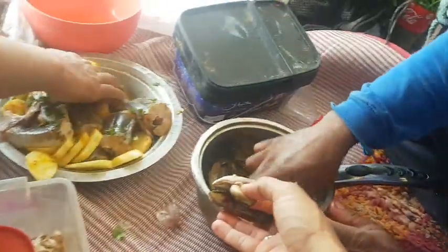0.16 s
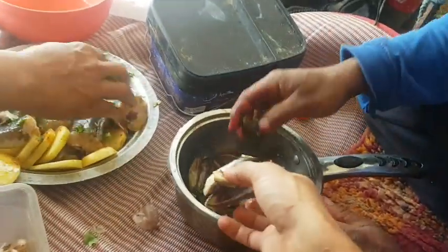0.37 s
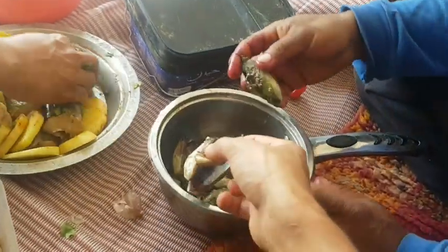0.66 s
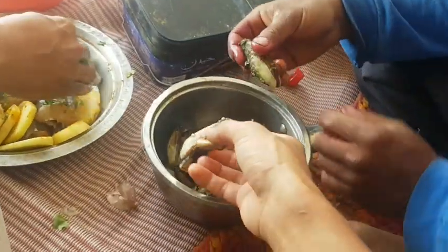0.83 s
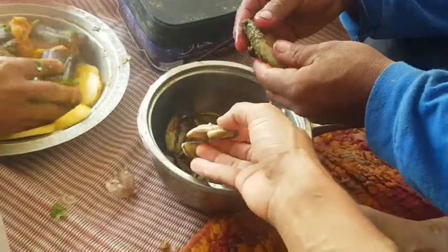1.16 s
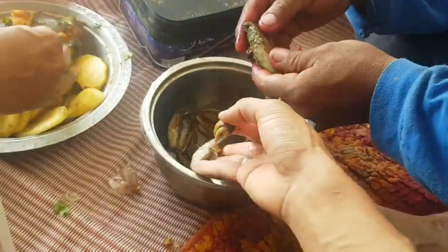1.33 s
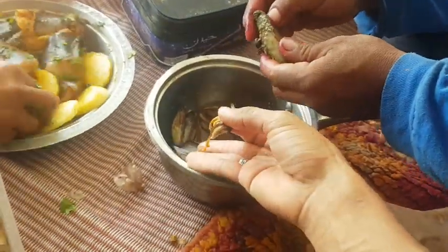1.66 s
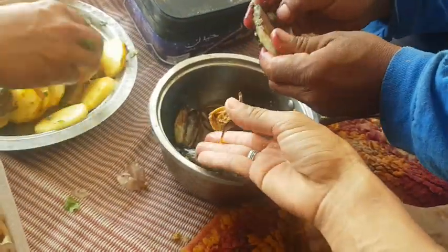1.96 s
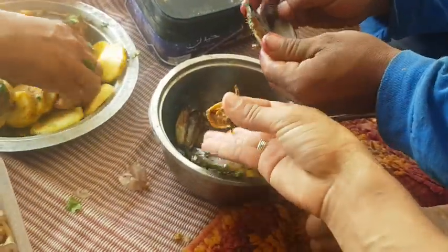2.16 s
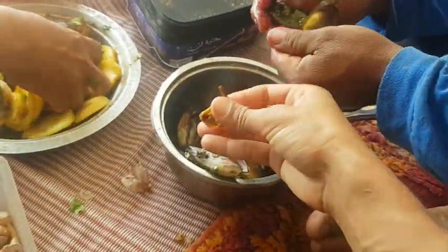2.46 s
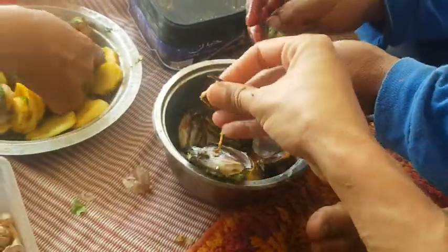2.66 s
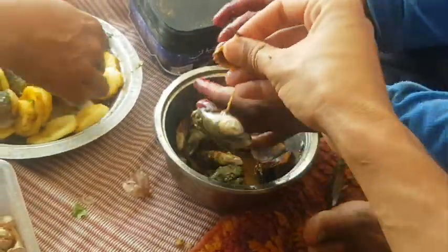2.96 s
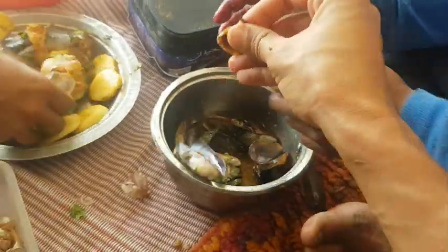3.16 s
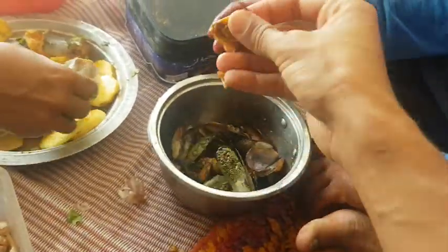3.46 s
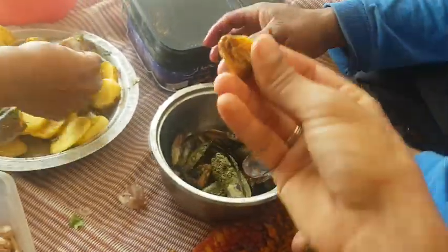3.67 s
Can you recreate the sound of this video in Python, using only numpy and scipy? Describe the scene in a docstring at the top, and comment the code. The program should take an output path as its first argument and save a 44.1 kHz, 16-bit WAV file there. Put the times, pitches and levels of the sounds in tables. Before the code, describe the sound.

Mussel shells click and clink against each other and a steel pot as hands pry them open

```python
"""Hands pick mussel shells out of a steel pot and pry them open, outdoors and heard close by.
First comes quick clicking over a wet scrape, then a lull with faint rustling; from 1.4 s the clicks return.
Near 3 s there is a low thud, then the hardest blows and a last run of clicks, while a soft rumble swells.
Each contact is a short chatter of tiny impacts that cracks and rings the shell's hollow; the pot rings too.
The rustle is ticks and noise in uneven patches; the outdoor air is filtered noise."""
import sys
import numpy as np
from scipy import signal
from scipy.fft import rfft, irfft, next_fast_len
from scipy.io import wavfile
from scipy.ndimage import uniform_filter1d

SR = 44100
rng = np.random.default_rng(int(sys.argv[2]) if len(sys.argv) > 2 else 0)


def transcribe(u):
    """Save the signal u as a 16-bit wav file named by the first command-line argument.

    u: samples, shape (n,) or (channels, n), limited to [-1, 1]; the rate is SR.
    q: integer samples, one column per channel.
    """
    v = np.clip(np.atleast_2d(u).T, -1, 1)
    q = np.round(v * 32767).astype(np.int16)
    wavfile.write(sys.argv[1], SR, q)


N = 167580  # length [samples]

RISE_S = 0.0024  # soft start of each contact [s]
# burst: share of samples with a micro-impact, decay [s]
GRIT_SHARE, CHATTER_S = 0.16, 0.003
# loose after-ticks behind each burst: level [dB], decay [s], share of samples
RATTLE_DB, RATTLE_S, RATTLE_SHARE = -13, 0.015, .03
SHELL_Q, SHELL_OVERTONE, OVERTONE_DB = 9., 1.818, -8  # sharpness, pitch ratio, level [dB]
CRACK_HZ, CRACK_Q, CRACK_DB = 1800, 1.3, -4
TREBLE_HZ, TREBLE_TOP_HZ = 3860, 11100  # edges of the treble band [Hz]
# low knock: deep shells and soft blows knock more
KNOCK_HZ, KNOCK_Q, KNOCK_DB = 499, 2, -20
KNOCK_DB_PER_OCT, KNOCK_PER_LEVEL = -7, -0.38  # per octave of shell pitch; per dB of contact level

# each pot mode is a pair of tones: spread of their detuning (share), of their level [dB]
POT_SPLIT, POT_SCATTER_DB = .009, 5.
POT_DB_PER_OCT = -4  # modes far from the shell's pitch ring less
SOFT_DAMPING = .2  # softer blows fade sooner
MUFFLED_T60 = .07  # extra fade once the next contact muffles the pot [s per 60 dB]

ECHO_DB, ECHO_T60, ECHO_START_S = -5.5, 0.093, .0005  # pot walls and mat
ECHO_TOP_HZ = 10800

TICKS_PER_S = 1800
SCRAPE_HZ, FIZZ_HZ = 1750, 7500.
PATCHY_DB, FLICKER_DB = 3.3, 1.6  # unevenness over time and pitch; over time alone

BUMP_S, BUMP_DB, BUMP_HZ, BUMP_T60 = 2.96, -31.5, 100, 0.069  # a hand knocks the mat
AIR_DB = -55.5  # steady air, average level
LAG_S, LAG_LIMIT = .00007, 1.5  # left-right lag of low tones [s]; largest phase difference [rad]
EDGE_HZ = 15900  # upper limit of the sound [Hz]


def amp(db):
    """Turns decibels into a factor."""
    return 10 ** (np.asarray(db) / 20)


def evened(x):
    """Scales x to rms 1."""
    return x / np.sqrt(np.mean(x ** 2) + 1e-20)


def read(points, hz):
    """Reads a (Hz, value) table between its points, along a logarithmic pitch scale."""
    f, value = np.transpose(points)
    return np.interp(np.log(hz + 1), np.log(f + 1), value)


def curve(points, column=1):
    """Draws straight lines over time between the points of a table."""
    columns = np.transpose(points)
    return np.interp(np.arange(N) / SR, columns[0], columns[column])


def add(mix, s, sound):
    """Adds a sound to the mix from s seconds on."""
    part = mix[round(s * SR):][:len(sound)]
    part += sound[:len(part)]


def band(x, hz, q):
    """One resonance, scaled to rms 1."""
    return evened(signal.lfilter(*signal.iirpeak(min(hz, SR / 2.2), q, SR), x))


def band_twice(x, hz, q):
    """The same resonance passed twice, for steeper sides."""
    return band(band(x, hz, q), hz, q)


def shaped(x, gain):
    """Multiplies the spectrum of x by gain(hz)."""
    size = next_fast_len(N)
    return irfft(rfft(x, size) * gain(np.fft.rfftfreq(size, 1 / SR)), size)[..., :N]


def shell_click(t, rise, db, shell_hz, treble_db):
    """A burst of micro-impacts drives the shell's hollow, a crack, treble and a low knock."""
    size, hiss = rng.standard_normal((2, len(t)))
    chance = rng.random(len(t))
    burst = np.exp(-t / CHATTER_S)
    rattle = amp(RATTLE_DB) * np.exp(-t / RATTLE_S)
    grit = size * rise * ((chance < GRIT_SHARE) * burst + (chance < RATTLE_SHARE) * rattle)
    hiss = hiss * rise * burst

    hollow = band(grit, shell_hz, SHELL_Q)
    overtone = band(grit, shell_hz * SHELL_OVERTONE, SHELL_Q)
    crack = band_twice(hiss + grit, CRACK_HZ, CRACK_Q)
    treble_band = signal.butter(1, [TREBLE_HZ, TREBLE_TOP_HZ], "band", fs=SR, output="sos")
    treble = evened(signal.sosfilt(treble_band, hiss + grit))
    knock = band_twice(hiss, KNOCK_HZ, KNOCK_Q)
    octaves = np.log2(shell_hz / CRACK_HZ)
    knock_db = KNOCK_DB + KNOCK_PER_LEVEL * db + KNOCK_DB_PER_OCT * octaves

    shell = hollow + amp(OVERTONE_DB) * overtone + amp(CRACK_DB) * crack
    shell += amp(treble_db) * treble + amp(knock_db) * knock
    return amp(db) * shell / abs(shell).max()


def pot_ring(t, rise, gap_s, db, shell_hz, pot_db):
    """The steel pot's modes ring as slightly detuned pairs, until the next contact muffles them."""
    # modes of the steel pot, before scatter and damping:
    # (pitch [Hz], level [dB], time to fade by 60 dB after a 0 dB contact [s])
    pot_modes = [(372, -24, .1), (500, -16, .09), (759, -24, .25), (1250, -16, .08), (2131, -17, .48),
                 (2541, -13, .14), (2955, -11, .14), (3628, -20, .1), (4430, -19, .1), (4690, -15, .14),
                 (5297, -11, .13), (5771, -22, .2), (6900, -18, .09), (8010, -18, .11), (9770, -21, .14)]
    hz, mode_db, t60 = np.transpose(pot_modes)[:, :, None]
    detune, scatter, phase = rng.standard_normal((3, len(pot_modes), 1))
    pair = np.sin(2 * np.pi * hz * t + phase)
    pair += .5 * np.sin(2 * np.pi * hz * (1 + POT_SPLIT * detune) * t)
    mode_db = mode_db + POT_SCATTER_DB * np.tanh(scatter)
    mode_db = mode_db + POT_DB_PER_OCT * abs(np.log2(hz / shell_hz))
    fade = t / (t60 * amp(SOFT_DAMPING * db)) + np.maximum(t - gap_s, 0) / MUFFLED_T60
    ring = (amp(mode_db - 60 * fade) * pair).sum(0) * rise
    ending = np.minimum(1, 20 * (1 - t / t[-1]))  # smooth last twentieth
    return amp(db + pot_db) * ring * ending


def contacts():
    """Lays out every shell contact in time; returns the shell sounds and the pot's ringing."""
    # shell contacts: (time [s], shell peak level [dB], shell pitch [Hz],
    # treble level before peak scaling [dB], pot ring level relative to the contact [dB])
    touches = [(0.022, -33, 980, 3, -16), (0.115, -26, 1350, 0, -25), (0.209, -28.5, 1230, -36, -6),
               (0.239, -29.5, 2500, -4, -24), (0.252, -19, 4430, -50, -12), (0.265, -27, 2820, -31, -27),
               (0.286, -31, 2030, -30, -20), (0.298, -16.5, 2490, -39, -23), (0.328, -21, 1270, 6.5, -14),
               (0.337, -27, 2150, -15, -20), (0.361, -35.5, 1340, -1, -21), (0.435, -23, 1780, -1.5, -5.5),
               (0.481, -30.5, 1230, -32, -15), (0.648, -23, 2180, -42, -17), (1.442, -23, 1183, 1, -3),
               (1.665, -39, 2560, -32, -27), (1.679, -25, 1220, 1, 0), (1.712, -27.5, 1400, -7, -4),
               (1.768, -19.5, 1330, -4, -1), (1.822, -28.5, 1350, -35, -10), (1.989, -34, 1310, -4.5, -7),
               (2.098, -32, 2070, -5.5, -7), (2.138, -20.5, 2910, -24, -5.5), (2.333, -21.5, 1454, -6.5, 1),
               (2.411, -25, 3000, -26, -13), (2.442, -15.5, 2490, -51, -11), (2.494, -20, 2920, -5, -3),
               (2.504, -22.5, 2540, -39, -1.5), (2.551, -17, 2575, -16, -10), (2.668, -22, 2850, -46, -3),
               (2.899, -13.5, 1250, -25, -4), (3.018, -8, 3970, -7.5, -15), (3.06, -25, 1295, -6.5, -21),
               (3.113, -24, 1380, -71, -54), (3.161, -22, 3140, -6.5, -8.5), (3.258, -7, 5070, -25, 1.5),
               (3.272, -4.5, 1327, -2.5, -12), (3.289, -17, 2300, -30, 4.5), (3.322, -16, 1720, -4, -4.5),
               (3.392, -15.5, 2670, -37, -5), (3.41, -27, 1850, -25, -30), (3.438, -22, 2550, -7, -14),
               (3.444, -23, 2560, -32, -17), (3.45, -18.5, 2240, 0.5, -13.5),
               (3.472, -28.5, 4800, -30, -20), (3.489, -27.5, 1780, 5.5, -9),
               (3.607, -28.5, 2400, -47, -19), (3.658, -36, 1420, -26, -18)]
    shells, pot = np.zeros((2, N))
    gaps = np.diff([row[0] for row in touches], append=N / SR)
    t = np.arange(SR // 4) / SR
    rise = 1 - np.exp(-(t / RISE_S) ** 2)
    for gap_s, (s, db, shell_hz, treble_db, pot_db) in zip(gaps, touches):
        add(shells, s, shell_click(t, rise, db, shell_hz, treble_db))
        add(pot, s, pot_ring(t, rise, gap_s, db, shell_hz, pot_db))
    return shells, pot


def echoes(x):
    """Sparse, dulled, decaying reflections, drawn separately for left and right."""
    t = np.arange(SR // 2) / SR
    taps = rng.standard_normal((2, len(t))) * (rng.random((2, len(t))) < .1)
    taps = taps * (t > ECHO_START_S) * amp(-60 * t / ECHO_T60)
    taps = taps / np.linalg.norm(taps, axis=1)[:, None]
    wet = signal.fftconvolve(x[None], taps, axes=1)[:, :N]
    return amp(ECHO_DB) * shaped(wet, lambda hz: 1 / np.sqrt(1 + (hz / ECHO_TOP_HZ) ** 2))


def rustle():
    """Wet shells and fingers: tiny ticks and noise in uneven patches make a dull scrape and a wet fizz."""
    # (time [s], scrape level [dB], fizz level [dB])
    rustle_levels = [(0, -41.5, -42), (.05, -48.5, -46), (.15, -51.5, -50), (.27, -43, -48.5),
                     (.38, -54.5, -62.5), (.55, -64.5, -67), (.75, -53, -56), (.95, -83, -76.5),
                     (1.27, -57, -62.5), (1.42, -66, -64.5), (1.62, -65.5, -57), (2.05, -61.5, -69.5),
                     (2.4, -59.5, -63), (2.8, -68, -66.5), (3.55, -62, -66.5), (3.8, -62.5, -65.5)]
    strength = amp(2.5 * np.minimum(rng.exponential(1, N), 4))
    ticks = rng.standard_normal(N) * (rng.random(N) < TICKS_PER_S / SR) * strength
    rubbing = evened(ticks) + .5 * rng.standard_normal(N)

    z = signal.stft(rubbing, nperseg=256)[2]  # rows are pitch, columns are time
    patches = uniform_filter1d(rng.standard_normal(z.shape), size=6, axis=0)
    patches = evened(uniform_filter1d(patches, size=8, axis=1))
    flicker = evened(uniform_filter1d(rng.standard_normal(z.shape[1]), size=4))
    z = z * amp(PATCHY_DB * patches + FLICKER_DB * flicker)
    x = signal.istft(z, nperseg=256)[1][:N]

    scrape = band_twice(x, SCRAPE_HZ, 0.47)
    fizz = evened(shaped(x, lambda hz: 1 / (1 + (FIZZ_HZ / (hz + 1)) ** 2)))
    return amp(curve(rustle_levels)) * scrape + amp(curve(rustle_levels, column=2)) * fizz


def bump():
    """One dull low thud: a fading sine."""
    t, out = np.arange(SR // 2) / SR, np.zeros(N)
    add(out, BUMP_S, amp(BUMP_DB - 60 * t / BUMP_T60) * np.sin(2 * np.pi * BUMP_HZ * t))
    return out


def air():
    """Steady outdoor noise and a swelling low rumble, both partly shared by left and right."""
    # colour of the steady air: (pitch [Hz], relative level [dB])
    air_colour = [(15, -32), (25, -33), (123, -2), (166, -7.5), (363, -6), (677, -10.5), (16000, -48)]
    # low rumble: (time [s], level [dB])
    rumble_levels = [(0, -66.5), (3.8, -58)]
    # left-right likeness of the air: (pitch [Hz], likeness, held within 0 to 1)
    likeness = [(60, 1), (950, 0.37), (15000, -2.5)]
    a, b, c = rng.standard_normal((3, N))
    same = lambda hz: np.clip(read(likeness, hz), 0, 1)
    right = shaped(a, same) + shaped(b, lambda hz: np.sqrt(1 - same(hz) ** 2))
    steady = evened(shaped(np.array([a, right]), lambda hz: amp(read(air_colour, hz))))
    rumble = c + 0.12 * np.array([a, b])
    rumble = evened(shaped(rumble, lambda hz: hz ** 3 / (1 + (hz / 65.0) ** 6)))
    return amp(AIR_DB) * steady + amp(curve(rumble_levels)) * rumble


def to_both_sides(x):
    """Splits a sound into left and right, with a small lag and a level lean that depend on pitch."""
    # (pitch [Hz], left minus right level [dB])
    lean = [(60, -12.5), (1200, 6.5), (3000, -1), (10000, 5)]
    lag = lambda hz: LAG_LIMIT * np.tanh(2 * np.pi * hz * LAG_S / LAG_LIMIT)
    side = lambda hz, k: amp(k * read(lean, hz)) * np.exp(1j * k * lag(hz))
    return shaped(x, lambda hz: np.array([side(hz, k) for k in (.5, -.5)]))


def scene():
    """Shells, rustle and pot lean and lag between left and right; shells and rustle also echo."""
    shells, pot = contacts()
    shells = shells + rustle()
    return to_both_sides(shells + pot) + echoes(shells) + air() + bump()


def record(dry):
    """Removes everything above the upper limit of the sound."""
    low_pass = signal.firwin(401, EDGE_HZ, window=("kaiser", 12), fs=SR)
    return signal.oaconvolve(dry, low_pass[None], "same")


dry = scene()
out = record(dry)
transcribe(out)
```